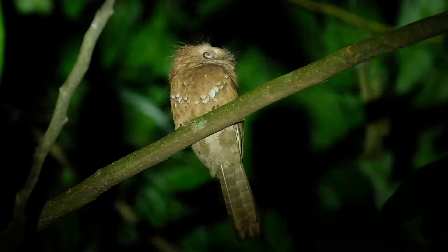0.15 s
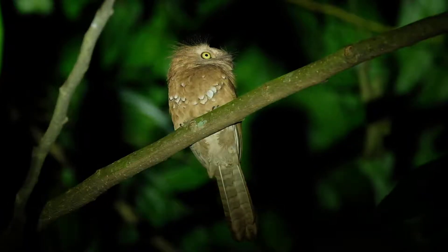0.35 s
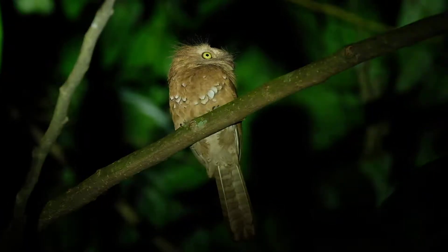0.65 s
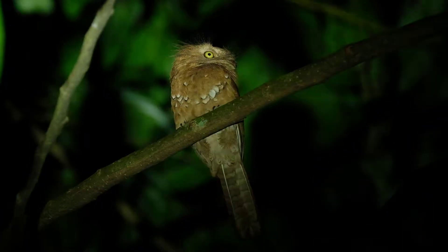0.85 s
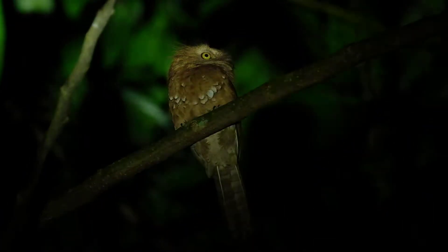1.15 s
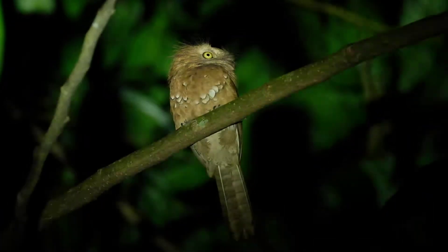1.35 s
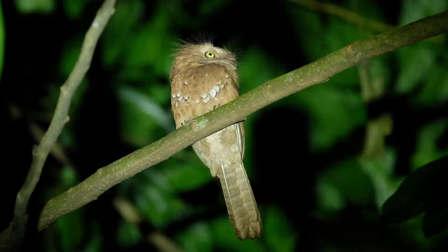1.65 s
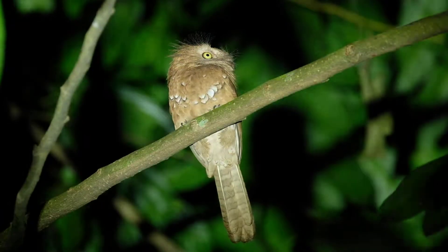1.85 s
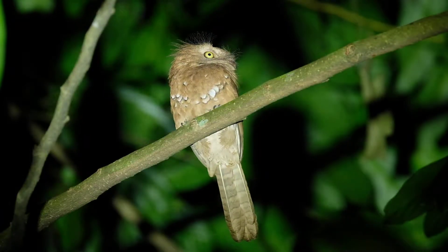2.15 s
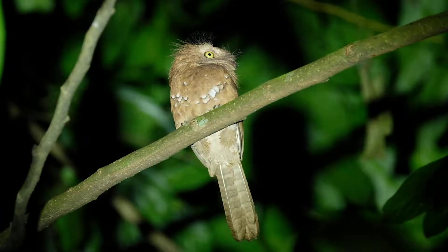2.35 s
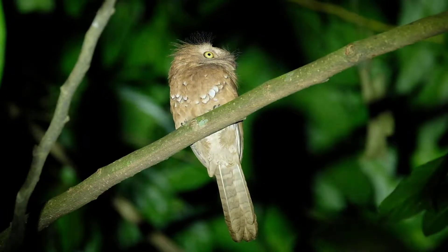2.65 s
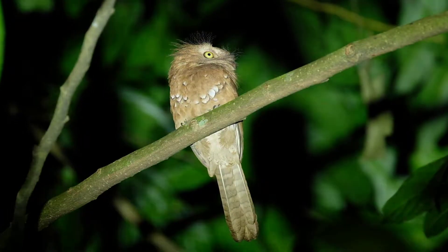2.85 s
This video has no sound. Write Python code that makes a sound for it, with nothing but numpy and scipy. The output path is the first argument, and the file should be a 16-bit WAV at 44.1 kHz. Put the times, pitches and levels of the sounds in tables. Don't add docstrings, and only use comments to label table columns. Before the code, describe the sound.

Crickets and other night insects sing in a forest. A close, rapid mid-high trill runs until 1.1 s and swells back from 2.6 s. Lower short chirps come about every 0.6 s from 0.3 s, with thin high whistling phrases near 0, 0.7, 1.6 and 2.5 s. Soft pulsing rasps and a far chorus continue over faint air and engine rumble. Small handling taps cluster from 0.1 to 0.7 s.

```python
import sys
import numpy as np
from scipy import signal
from scipy.io import wavfile
from scipy.ndimage import uniform_filter1d

SR = 44100
rng = np.random.default_rng(int(sys.argv[2]) if len(sys.argv) > 2 else 0)


def store_pcm(level_fs):
    pcm = np.round(np.clip(level_fs, -1, 1) * 32767).astype(np.int16)
    wavfile.write(sys.argv[1], SR, np.atleast_2d(pcm).T)


def magnitude_from_level(level_db):
    exponent = np.asarray(level_db, float) / 20
    return 10 ** exponent


N = 132741
T = np.arange(N) / SR

# start_s, end_s, level_db
TRILLS = [
    (-.13, 1.131, -40),
    (2.632, 3.2, -42),
]
TRUNK_ECHO_DB = [-0.5, -31]
# start_s, level_db, syllables_per_s, first_syllable_db, fourth_syllable_db
CHIRPS = [
    (.279, -41.5, 17.5, -1, -6.5),
    (.96, -45.5, 17.6, 2.5, -7),
    (1.585, -43, 19.7, -4, -6),
    (2.185, -43, 17.3, -2.5, -21),
    (2.805, -46.5, 18, 4.3, -15),
]
SYLLABLE_DB = [-2.5, 0, -6.5, -7, -17, -19.5]
# start_s, length_s, level_db, syllables_per_s
WHISTLES = [
    (-.1, .54, -50, 37),
    (0.712, 0.49, -48.5, 28),
    (1.607, .56, -51, 35),
    (2.527, 0.58, -48.5, 36),
]
# pitch_hz, width_hz, level_db
RASP_WING = [
    (4695, 310, -5.5),
    (4936, 170, -2),
    (5423, 240, 5.5),
]
# start_s, peak_db, ring_hz, t60_s, tick_db
TAPS = [
    (.0965, -31.5, 1384, 0.035, 4),
    (0.1581, -32.5, 960, 0.021, 4),
    (0.2683, -34.5, 1730, 0.012, 7),
    (0.4872, -30, 984, 0.024, -33),
    (.694, -41, 1580, 0.01, 1),
    (2.57, -53, 676, 0.025, -6),
]
# pitch_hz, width_hz, level_db, throb_db, throbs_per_s, throb_peak_s, left_right_db
CHORUS = [(1270, 223, -62, 3, 1.03, 0.062, 1.8), (2884, 830, -68.5, 6.5, 3.2, 0.14, 6),
          (3769, 490, -61, 0, 4.7, .1, 3), (5136, 1150, -62, 8, 4.522, 0.0067, 5.8),
          (6033, 690, -57, 3.5, 2.405, 0.24, 2.5), (7700, 750, -77.5, 5.8, 1.7, 0.35, 5.5),
          (8890, 2060, -66.5, 0.2, 1.08, 0.48, .4), (10706, 1950, -67, 2.7, 1.29, 0.71, 1.3),
          (6850, 350, -74, 13, 2.2, 0.74, 8)]
# frequency_hz, level_db
AIR_SPECTRUM = [(55, -2.5), (120, -1), (330, -2.5), (700, -12), (2200, -27), (4200, -32.5), (11000, -47),
                (12500, -52.5)]
# frequency_hz, correlation (0 to 1)
PORT_LIKENESS = [(60, 0.96), (300, 0.74), (700, 0.25), (1500, 0.3), (3000, .2), (12000, .1)]
# time_s, pitch_hz, level_db
ENGINE = [(.07, 208, -51), (.6, 268, -47.5), (1.1, 424, -45), (1.5, 359, -46.5), (1.9, 284, -46),
          (2.3, 286, -62.5), (2.6, 292, -42.5), (3, 291, -44.5)]
# pitch_hz, level_db
HUM = [(123.8, -52), (301.5, -52.5), (479.1, -57), (538.3, -67.5)]


def evened(x):
    return x / np.sqrt(np.mean(x ** 2) + 1e-20)


def read(points, hz):
    f, value = np.transpose(points)
    return np.interp(np.log(hz + 1), np.log(f + 1), value)


def resonate(x, hz, width, order=1):
    turn = np.exp(2j * np.pi * np.cumsum(hz * np.ones(x.shape[-1])) / SR)
    r = np.exp(-np.pi * width / SR)
    low = x / turn
    for _ in range(order):
        low = signal.lfilter([(1 - r) ** 2], [1, -2 * r, r * r], low)
    return 2 * (turn * low).real


def drift(rate):
    return evened(sum(np.sin(2 * np.pi * (f * T + rng.random())) for f in np.geomspace(rate / 8, rate, num=9)))


def strokes(turns, duty, soft):
    u = np.clip(turns % 1 / duty, 0, 1)
    return np.sin(np.pi * u) ** soft, u


def tone(hz):
    return np.sin(2 * np.pi * np.cumsum(hz) / SR)


def forest(x, pan_db, lag, wet_db, t60=0.43):
    t = np.arange(SR) / SR
    taps = rng.standard_normal((2, SR)) * (rng.random((2, SR)) < .05)
    taps *= magnitude_from_level(-60 * t / t60) * np.clip(t / 0.011 - .3, 0, 1)
    taps *= magnitude_from_level(wet_db) / np.linalg.norm(taps, axis=1, keepdims=True)
    taps[0, max(lag, 0)] += magnitude_from_level(pan_db / 2)
    taps[1, max(-lag, 0)] += magnitude_from_level(-pan_db / 2)
    return signal.fftconvolve(x[None], taps, axes=1)[:, :N]


def triller():
    strokes_per_s, stroke_at_s = 42.85, .801
    steady_hz, cold_hz, scoop_hz = 3830.05, 560, 440
    warm_s, swell_s, echo_s = .15, .2, .0107
    shape, u = strokes((T - stroke_at_s) * strokes_per_s, 0.426, soft=0.58)
    scoop = scoop_hz * (1 - u) ** 3.65
    out = np.zeros(N)
    for start, end, db in TRILLS:
        age = np.maximum(T - start, 0)
        hz = steady_hz - cold_hz * np.exp(-age / warm_s) - scoop + scoop.mean() % strokes_per_s
        swell = np.sin(np.pi / 2 * np.clip(age / swell_s, 0, 1)) ** 2
        swell = swell * np.clip((end - T) / 0.025, 0, 1)
        out += magnitude_from_level(db + 3.36 * np.minimum(age, 1.2)) * swell * tone(hz)
    out = out * shape * magnitude_from_level(0.4 * drift(30))
    echo = np.roll(out, round(echo_s * SR)) * magnitude_from_level(TRUNK_ECHO_DB)[:, None]
    return forest(out, -3.5, 3, -5, t60=.7) + echo


def chirper():
    pitch_hz, droop_hz, sag_hz = 3015, 45, 30.2
    under_hz, under_db = 130, -13.5
    link = .6
    out, wobble = np.zeros(N), drift(70)
    for start, db, rate, first_db, fourth_db in CHIRPS:
        turns = (T - start) * rate
        shape, u = strokes(turns, .97, soft=.65)
        k = np.floor(turns).astype(int)
        on = (k >= 0) & (k < len(SYLLABLE_DB))
        effort_db = np.take(SYLLABLE_DB, k, mode="clip") + first_db * (k == 0) + fourth_db * (k == 3)
        effort_db = uniform_filter1d(effort_db, size=1500)
        level = magnitude_from_level(db + 0.5 + effort_db + 2.8 * wobble) * on * (link * (turns > .5) + shape)
        late = np.clip(turns - 2.6, 0, 4)
        hz = pitch_hz - droop_hz * np.sin(np.pi * u ** 2) - sag_hz * late ** 1.4 + 7 * wobble
        phase = 2 * np.pi * np.cumsum(hz) / SR
        under = magnitude_from_level(under_db + 1.62 * late) * np.sin(phase - 2 * np.pi * under_hz * T + wobble)
        out += level * (np.sin(phase) + under)
    return forest(out, 6.7, -1, -5.4, t60=0.91)


def whistler():
    pitch_hz, rise_hz = 6744, 134.1
    out, fuzz = np.zeros(N), drift(110)
    for start, length, db, rate in WHISTLES:
        p = np.clip((T - start) / length, 0, 1)
        shape, u = strokes((T - start) * rate, .85, soft=0.28)
        hz = pitch_hz - rise_hz * (1 - p) ** 4 + 30 * (u - .5) + 18 * fuzz
        swell = np.minimum(p / 0.48, 1) ** 1.7 * np.minimum((1 - p) / 0.031, 1)
        out += magnitude_from_level(db + 0.5) * swell * shape * (1 + 0.12 * fuzz) * tone(hz)
    return forest(out, 9.5, -8, -4)


def rasper():
    bursts_per_s, burst_at_s, scrapes_per_s, teeth_per_s = 4.522, -.075, 24.1, 460
    turns = (T - burst_at_s) * bursts_per_s
    burst = strokes(turns, 0.84, soft=0.26)[0]
    scrape = strokes(turns % 1 / bursts_per_s * scrapes_per_s, 1.0, soft=0.57)[0]
    teeth = rng.standard_normal(N) * (rng.random(N) < teeth_per_s / SR)
    teeth = teeth * burst * (0.083 + scrape)
    wing = np.zeros(N)
    for k, (hz, width, db) in enumerate(RASP_WING):
        wing += (-1) ** k * magnitude_from_level(db) * evened(resonate(teeth, hz, width))
    return forest(magnitude_from_level(-58.5) * evened(wing), 8.2, -12, -2.5)


def taps():
    out, t = np.zeros(N), np.arange(4000) / SR
    chance = rng.standard_normal((len(TAPS), 200))
    early = t[:200]
    for (s, db, hz, t60, tick_db), noise in zip(TAPS, chance):
        ring = np.sin(2 * np.pi * hz * t)
        ring += 0.35 * np.sin(2 * np.pi * 1.37 * hz * t)
        ring += 0.62 * np.sin(2 * np.pi * 0.62 * hz * t)
        ring *= magnitude_from_level(-60 * t / t60) * np.minimum(t / 0.00027, 1)
        click = 1.8 * np.exp(-(early / .00009 - 1.5) ** 2)
        scuff = 0.34 * uniform_filter1d(noise, size=7) * magnitude_from_level(-60 * early / .012)
        ring[:200] += magnitude_from_level(tick_db) * (click + scuff)
        out[round(s * SR):][:4000] += magnitude_from_level(db) * ring
    return np.array([out, out])


def chorus():
    out = np.zeros((2, N))
    for hz, width, db, throb_db, rate, peak_s, pan_db in CHORUS:
        for side in range(2):
            teeth = rng.standard_normal(N) * (rng.random(N) < .12)
            throb = throb_db * (0.43 + 0.3 * side) * np.cos(2 * np.pi * rate * (T - peak_s))
            throb = throb + 0.86 * drift(25.17)
            level = magnitude_from_level(db + 2 + throb + pan_db * (1.0 - side))
            out[side] += level * evened(resonate(teeth, hz, width, order=2))
    return out


def air():
    frames, hz = N // 256 + 5, np.fft.rfftfreq(1024, 1 / SR)
    a, b, c, d, patches = rng.standard_normal((frames, 513, 5)).T
    patches = uniform_filter1d(patches, size=8, axis=0)
    patches = evened(uniform_filter1d(patches, size=12, axis=1))
    same = np.clip(read(PORT_LIKENESS, hz), -1, 1)[:, None]
    left = a + 1j * b
    right = same * left + np.sqrt(1 - same ** 2) * (c + 1j * d)
    right = right * np.exp(1j * hz[:, None] / 2300) * magnitude_from_level(-0.4)
    z = np.array([left, right]) * magnitude_from_level(read(AIR_SPECTRUM, hz)[:, None] + 1.45 * patches)
    return magnitude_from_level(-40.5) * evened(signal.istft(z, nperseg=1024, noverlap=768)[1][:, :N])


def drone():
    s, hz, db = np.transpose(ENGINE)
    roar = evened(resonate(rng.standard_normal(N), np.interp(T, s, hz), 116))
    roar = roar * magnitude_from_level(np.interp(T, s, db))
    hum = np.zeros(N)
    for hum_hz, hum_db in HUM:
        level = magnitude_from_level(hum_db + 4 + 2.1 * drift(6))
        hum += level * np.sin(2 * np.pi * (hum_hz * T + rng.random() + 0.089 * drift(4)))
    return (roar + hum * np.clip(T / 2.02, .3, 1)) * magnitude_from_level([[.5], [-.5]])


def scene():
    return triller() + chirper() + whistler() + rasper() + taps() + chorus() + air() + drone()


def top_cut(x):
    return signal.sosfilt(signal.butter(12, 15610, fs=SR, output="sos"), x)


def record(dry):
    on_s, settle_db, settle_s = 0.073, -4, 0.16
    age = T - on_s
    gain = np.clip(age / 0.00091, 0, 1) * magnitude_from_level(settle_db * np.exp(-np.maximum(age, 0) / settle_s))
    cut = signal.lfilter(*signal.butter(2, 66, "high", fs=SR), dry)
    cut = cut - 0.58 * resonate(cut, 4080, 610)
    return top_cut(cut * gain)


dry = scene()
out = record(dry)
store_pcm(out)
```